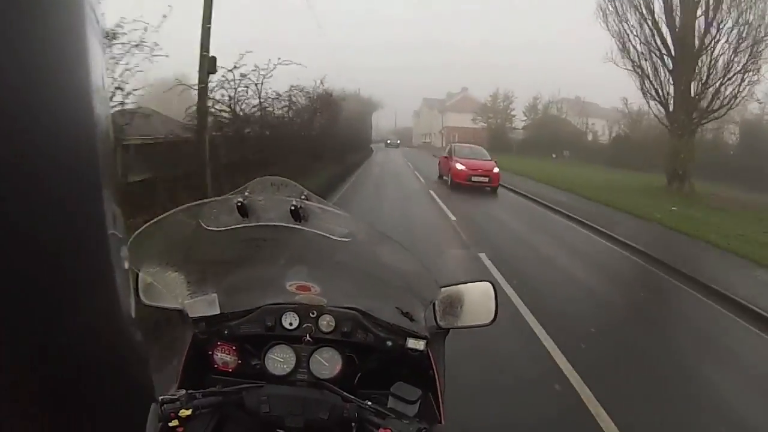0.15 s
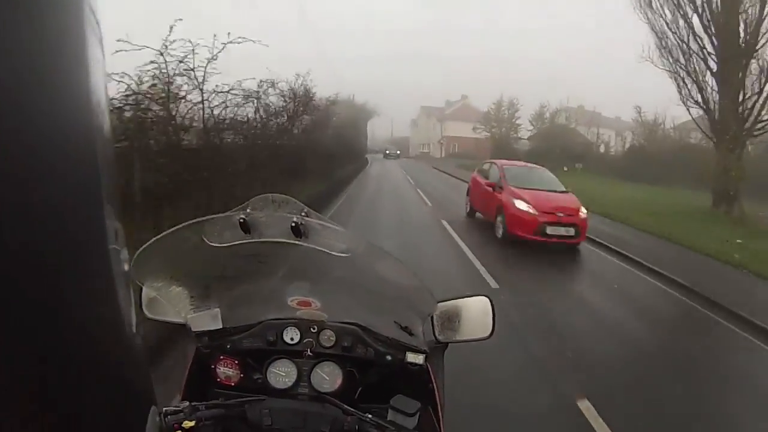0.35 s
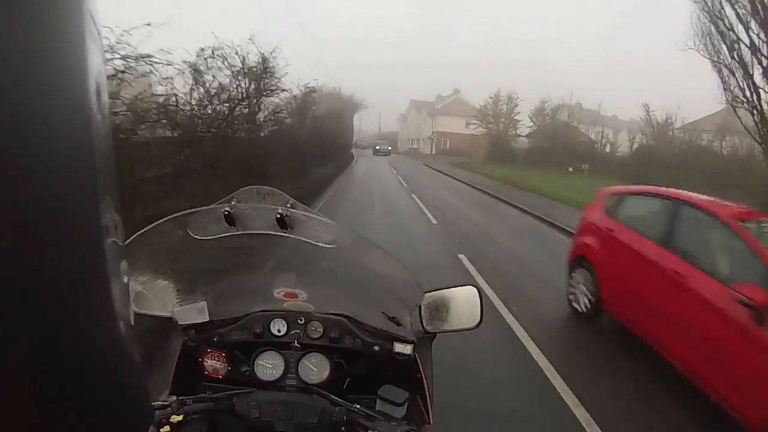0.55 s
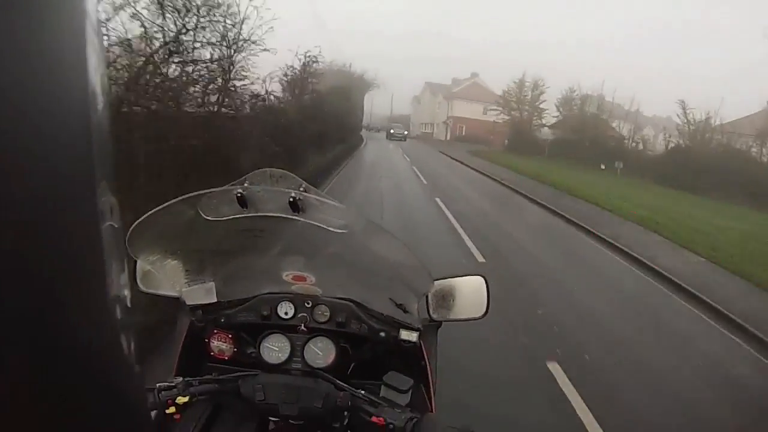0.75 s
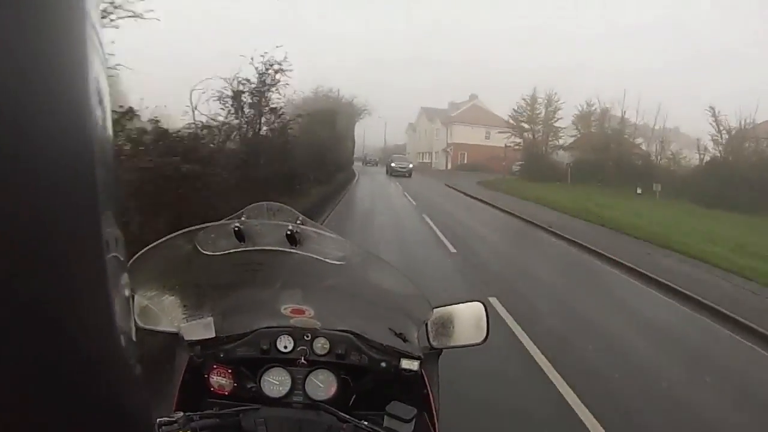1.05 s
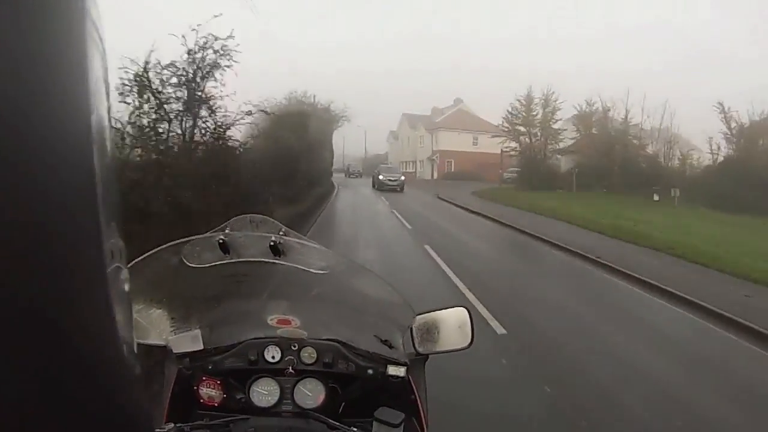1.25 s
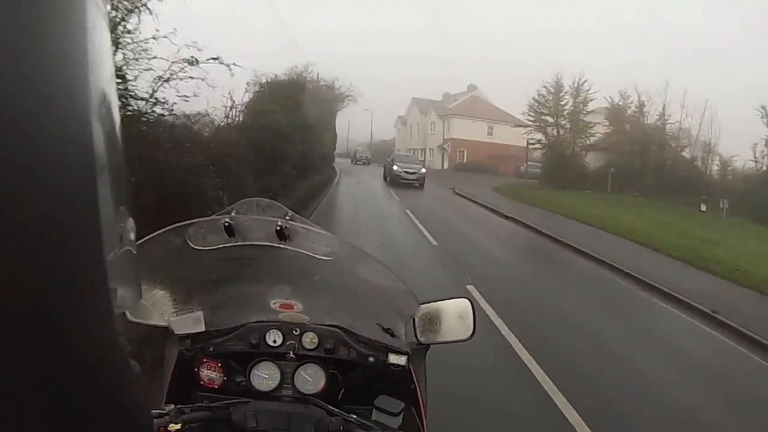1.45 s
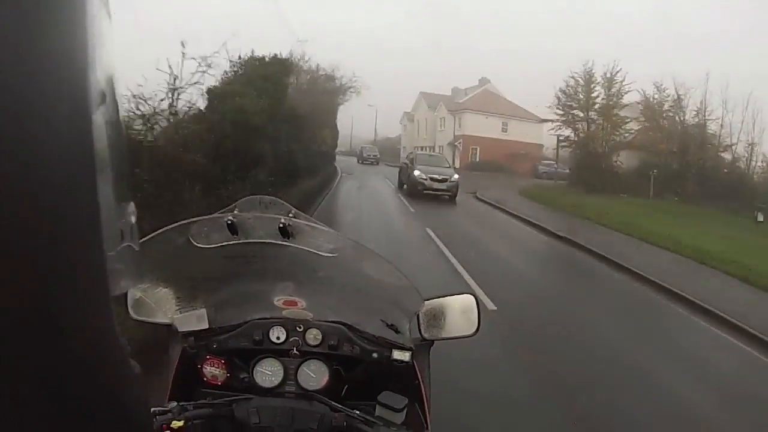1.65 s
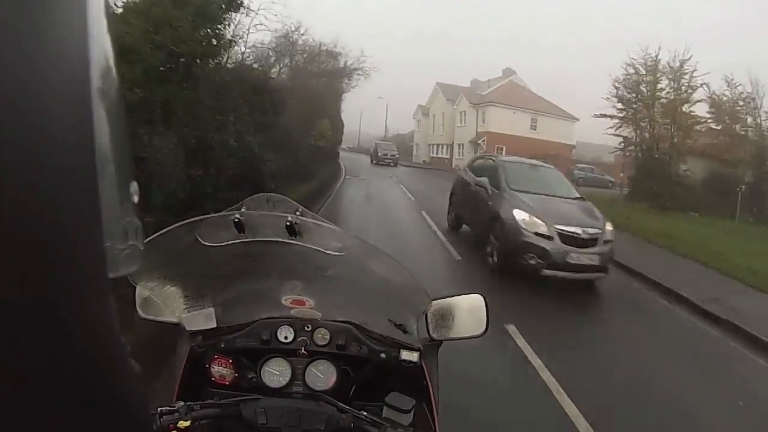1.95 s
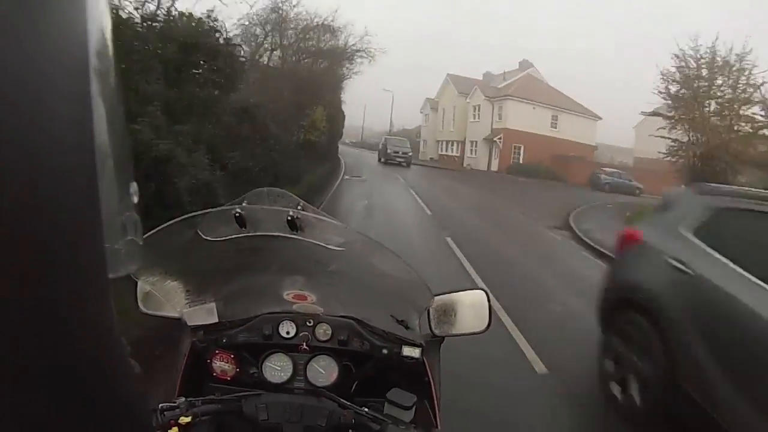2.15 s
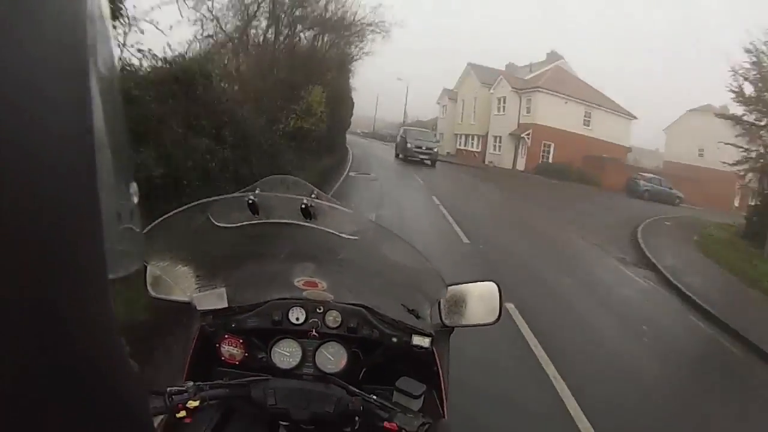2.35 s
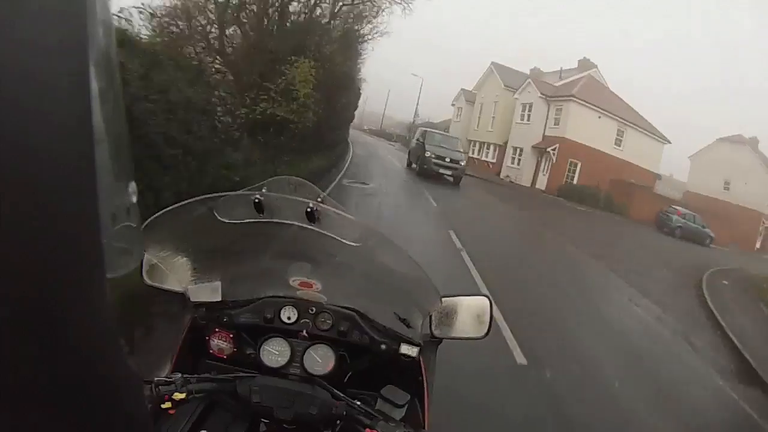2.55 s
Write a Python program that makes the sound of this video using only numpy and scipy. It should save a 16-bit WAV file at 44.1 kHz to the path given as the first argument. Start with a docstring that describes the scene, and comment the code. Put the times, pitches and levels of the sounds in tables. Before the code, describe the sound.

A plastic helmet visor clicks, knocks, then snaps loudly shut close to the microphone. Behind it a motorcycle hums along a wet road with wind, tyre spray and two passing cars, dipping after the snap and swelling back.

```python
"""Plastic, probably a visor, clicks, knocks and snaps shut by a microphone in a motorcyclist's helmet.
Each contact thuds the shell, rings and cracks. Behind it the bike cruises on a wet road:
exhaust hum, ticking valves, wind, tyre spray and two oncoming cars, coloured by the helmet.
The snap drives a limiter far down, and the ride swells back over more than a second."""
import sys
import numpy as np
from scipy import signal
from scipy.fft import rfft, irfft, next_fast_len
from scipy.io import wavfile
from scipy.ndimage import uniform_filter1d, minimum_filter1d, map_coordinates

SR = 44100
rng = np.random.default_rng(int(sys.argv[2]) if len(sys.argv) > 2 else 0)


def put_to_file(sound):
    """Save the sound as 16-bit audio at rate SR, in the file named by the first command-line argument."""
    columns = np.atleast_2d(sound).T  # one column per channel
    safe = np.clip(columns, -1, 1)
    whole_steps = np.round(safe * 32767)
    wavfile.write(sys.argv[1], SR, whole_steps.astype(np.int16))


N = 119070


def amp(db):
    """Decibels to gain."""
    return 10 ** (np.asarray(db) / 20)


def unit(x):
    """Scale to rms 1."""
    return x / np.sqrt(np.mean(x ** 2) + 1e-20)


def curve(rows):
    """One value per sample from (s, value) points."""
    return np.interp(np.arange(N) / SR, *np.transpose(rows))


def wobble(rate_hz):
    """Smooth random curve, rate_hz knots a second."""
    return map_coordinates(rng.standard_normal(2000), [np.arange(N) * rate_hz / SR + 4], mode="wrap")


def filtered(x, response):
    """Apply a gain given as a function of Hz."""
    size = next_fast_len(N + 8192)
    return irfft(rfft(x, size) * response(np.fft.rfftfreq(size, 1 / SR)), size)[..., :N]


def noise(spectrum):
    """Noise of rms 1 coloured by (Hz, dB) points."""
    hz, db = np.transpose(spectrum)
    white = rng.standard_normal(N)
    return unit(filtered(white, lambda f: amp(np.interp(np.log(f + 1), np.log(hz + 1), db))))


def eddies(spectrum, slow_db, fast_db, slow_hz, fast_hz):
    """Turbulent noise of rms 1 that swells and flutters."""
    return unit(noise(spectrum) * amp(slow_db * wobble(slow_hz) + fast_db * wobble(fast_hz)))


def resonances(x, bands):
    """Parallel band-passes from (Hz, width Hz, dB) rows."""
    return filtered(x, lambda f: sum(amp(db) * 1j * f * width / (hz * hz - f * f + 1j * f * width)
                                     for hz, width, db in bands))


# Oncoming cars. Each row: nearest moment in seconds, gain in dB, nearest distance over speed in seconds.
CAR_PASSES = [(.51, -31, 0.085), (1.99, -28.5, 0.21)]
# Tyre noise and tread roar. Each row: frequency in Hz, density in dB.
TYRE_SPECTRUM = [(200, -25), (500, -8.5), (720, 0.5), (1100, -3.5), (1480, -7), (1800, -9.5), (1900, -6.5),
                 (2400, -7.5), (2800, -12.5), (3300, -30.5), (5000, -27), (10000, -36.5), (15000, -61)]
TREAD_SPECTRUM = [(300, -33), (600, -8.5), (730, -1), (900, -2.5), (1080, -3.5), (1300, -10), (2000, -49)]
TREAD_DB, TREAD_LAG_S, CAR_MACH = 0.75, 0.04978, 0.11


def cars():
    """Tyre noise follows one over distance; the tread's roar drops in pitch as each car passes."""
    t, out = np.arange(N) / SR, np.zeros(N)
    for nearest_s, db, pass_s in CAR_PASSES:
        distance = np.hypot(1, (t - nearest_s) / pass_s)
        tread_distance = np.hypot(1, (t - nearest_s - TREAD_LAG_S) / pass_s)
        emitted_s = t - CAR_MACH * pass_s * tread_distance
        tread = map_coordinates(noise(TREAD_SPECTRUM), [emitted_s * SR], mode="wrap")
        out += amp(db) * (noise(TYRE_SPECTRUM) / distance + amp(TREAD_DB) * tread / tread_distance)
    return out


# Spray envelope. Each row: time in seconds, level in dB.
SPRAY_DB = [(0, -53), (.8, -53), (1.2, -51.5), (1.5, -48.5), (2.0, -46.5), (2.7, -50)]
# Spray hiss. Each row: frequency in Hz, density in dB.
SPRAY_SPECTRUM = [(1760, -12), (3000, -6), (3190, -1), (4090, -10), (4320, -9), (4820, 1), (5230, -4),
                  (5760, -3), (6690, -6.5), (7220, -5.5), (7840, -11), (9180, -13.5), (10200, -16),
                  (14600, -29), (15500, -36)]


def spray():
    """The tyres throw water off the road: a fluttering hiss."""
    hiss = eddies(SPRAY_SPECTRUM, slow_db=1.4, fast_db=1.3, slow_hz=18, fast_hz=470)
    return amp(curve(SPRAY_DB)) * hiss


# Wind envelopes. Each row: time in seconds, level in dB.
DRAUGHT_DB = [(0, -29.5), (.04, -25), (.1, -26), (.14, -21), (.2, -31), (.25, -24.5), (.36, -23.5),
              (.48, -21), (.55, -25), (.69, -29), (.82, -25), (1.0, -32.5), (1.2, -37), (2.7, -68)]
RUSH_DB = [(0, -31), (.8, -44), (1.27, -39), (1.38, -27.5), (1.6, -27.5), (1.9, -29), (2.25, -28.5),
           (2.6, -29), (2.7, -29)]
BUFFET_DB = [(0, -31), (.8, -41), (1.1, -36), (1.4, -32), (1.6, -45), (1.85, -35), (1.98, -32.5),
             (2.15, -38), (2.31, -27), (2.45, -35), (2.59, -27), (2.7, -40)]
GAP_DB = [(0, -38), (.06, -39), (.2, -43.5), (.35, -39), (.53, -40), (.58, -51), (.72, -58), (.9, -83)]
# Wind spectra. Each row: frequency in Hz, density in dB.
DRAUGHT_SPECTRUM = [(29, -45), (50, -4), (70, -10.5), (160, -0.5), (188, -5), (244, -0.5), (327, 0.5),
                    (456, -1), (623, -18), (853, -13.5), (1150, -7.5), (1600, -24), (1800, -18),
                    (2070, -24), (2300, -17), (3200, -47), (4160, -50), (7040, -120)]
RUSH_SPECTRUM = [(120, -30), (200, -9.5), (333, -12), (432, -3.5), (498, 0), (632, -3), (694, -5.5),
                 (801, -11.5), (1040, -9.5), (1270, -24.5), (1750, -18.5), (1920, -22), (2330, -13),
                 (3400, -31.5), (4420, -42.5), (7480, -120)]
BUFFET_SPECTRUM = [(20, -6), (45, -1), (100, -4.5), (220, -2), (350, -0.5), (700, -19.5), (1500, -57)]
GAP_SPECTRUM = [(1710, -24), (2900, 4), (3150, -1), (4600, -5.5), (6130, -10.5), (7110, -13.5),
                (7840, -21.5), (8410, -21.5), (10700, -23.5), (13100, -29), (15500, -41)]


def wind():
    """Draught and hiss in the visor gap fade once it shuts; air rushes round the shell and buffets it."""
    draught = eddies(DRAUGHT_SPECTRUM, slow_db=2.5, fast_db=1.4, slow_hz=22.76, fast_hz=140)
    rush = eddies(RUSH_SPECTRUM, slow_db=1.47, fast_db=1.5, slow_hz=12, fast_hz=110)
    buffet = eddies(BUFFET_SPECTRUM, slow_db=2, fast_db=-1.0, slow_hz=20, fast_hz=110)
    hiss = eddies(GAP_SPECTRUM, slow_db=1.0, fast_db=1.7, slow_hz=25, fast_hz=190)
    layers = [(DRAUGHT_DB, draught), (GAP_DB, hiss), (RUSH_DB, rush), (BUFFET_DB, buffet)]
    return sum(amp(curve(envelope)) * layer for envelope, layer in layers)


# Single eddies. Each row: centre in seconds, pitch in Hz, envelope peak in dB, half length in seconds.
WIND_BUMPS = [(0.198, 348, -15.5, .003), (0.469, 361, -12.5, 0.006), (1.336, 410, -17, 0.0044),
              (1.991, 257, -21, .007), (2.315, 100, -19.5, .008), (2.585, 189, -21.5, 0.01)]


def wind_bumps():
    """Single eddies bump the helmet: a few low cycles each."""
    t, out = np.arange(N) / SR, np.zeros(N)
    for centre_s, hz, db, half_s in WIND_BUMPS:
        offset_s = t - centre_s
        out += amp(db) * np.exp(-(offset_s / half_s) ** 2) * np.sin(2 * np.pi * hz * offset_s)
    return out


# Crank speed. Each row: time in seconds, turns per second.
CRANK_HZ = [(0, 40.12), (.8, 39.7), (1.4, 39.44), (2.0, 39.4), (2.7, 39.52)]


def crank_angle():
    """Crankshaft angle in radians; the speed wavers slightly."""
    speed_hz = curve(CRANK_HZ) * (1 + 0.0015 * wobble(14))
    return 2 * np.pi * np.cumsum(speed_hz) / SR


# Valve ticks. Each row: place in the cam's turn from 0 to 1, centre in Hz, filter width in Hz, gain in dB.
VALVE_TICKS = [(0.77, 4900, 390, -55), (0.2, 4920, 380, -61), (.41, 8330, 470, -62.5),
               (0.69, 9940, 1400, -62), (.35, 10400, 1240, -66), (.05, 10000, 1600, -66)]
# Ticking envelope. Each row: time in seconds, gain in dB.
TICK_DB = [(0, -9), (.9, -10), (1.2, -8.5), (1.6, 0), (2.7, -5.5)]
TICK_SHARPNESS, TICK_SCATTER_DB = 4.9, 4


def valves(crank_rad):
    """Each valve ticks once per cam turn, at half crank speed: a metallic sizzle of uneven strength."""
    out = np.zeros(N)
    for place, hz, width_hz, db in VALVE_TICKS:
        band = [(hz, width_hz, 0)]
        sizzle = resonances(resonances(rng.standard_normal(N), band), band)
        pulses = np.exp(TICK_SHARPNESS * np.cos(crank_rad / 2 - 2 * np.pi * place))
        strength = amp(TICK_SCATTER_DB * wobble(29.83))
        out += amp(db) * unit(sizzle * pulses * strength)
    return amp(curve(TICK_DB)) * out


# Exhaust hum. Each row: multiple of the crank speed, level in dB.
EXHAUST_ORDERS = [(2, -34.5), (3, -35.5), (4, -40), (5, -46.5), (6, -40), (7, -46.5), (8, -48), (9, -54),
                  (10, -48.5)]
# Engine clatter. Each row: frequency in Hz, density in dB.
CLATTER_SPECTRUM = [(76, -21), (130, -4), (141, 0.5), (338, 2), (427, -29), (576, -38), (600, -23),
                    (651, -21), (1480, -13.5), (1560, -10), (3400, -50.5), (4420, -68), (7480, -120)]
FIRING_JITTER_RAD, ROUGHNESS_DB = 0.05, 1.2
CLATTER_DB, CLATTER_DEPTH = -36, 0.63


def engine(crank_rad):
    """The exhaust hums at crank harmonics, each wavering slightly in level; clatter pulses once a turn."""
    firing_rad = crank_rad + FIRING_JITTER_RAD * wobble(29.92)
    hum = np.zeros(N)
    for order, db in EXHAUST_ORDERS:
        peak = np.sqrt(2) * amp(db + ROUGHNESS_DB * wobble(38))
        hum += peak * np.sin(order * firing_rad + rng.uniform(0, 2 * np.pi))
    clatter = noise(CLATTER_SPECTRUM) * (1 + CLATTER_DEPTH * np.cos(crank_rad))
    return hum + amp(CLATTER_DB) * unit(clatter)


# Helmet resonances. Each row: centre in Hz, width in Hz, gain in dB.
HELMET_BANDS = [(492.2, 7.8, -5), (723, 23, -13), (1700, 16, -1), (2380, 27, -19.5), (4860, 36, -8.5),
                (8370, 110, -7.5), (9800, 150, -11.5), (10700, 110, -3), (12100, 200, -10),
                (13130, 150, -5)]


def helmet(outside):
    """The helmet adds narrow resonances to the sound from outside."""
    return outside + resonances(outside, HELMET_BANDS)


# Plastic contacts. Each row: start in seconds, then thud, ring and crack gains in dB.
VISOR_CONTACTS = [(0.1163, -8, -7, -10.5), (0.1182, -5, -5.5, -21), (0.1204, -7, -13, -40),
                  (0.1261, -5, -17, -47), (0.1274, -25, -12, -40), (0.1335, -10, -40, -39),
                  (0.5714, 12.5, -7, -17), (0.5748, -1.5, -18, -22.5), (0.7055, -35, -27, -17),
                  (0.7077, -34, -10, -30), (0.7101, -17, -2, -2.5), (0.7106, -1.5, 4, 9),
                  (.7119, 6, 27.5, 21.5), (1.885, -10, -16, -22), (2.021, -10, -21, -25),
                  (2.3236, -25, -25, -27), (2.3273, -26, -11.5, -17.5)]
# Low and high shell modes. Each row: frequency in Hz, relative level in dB, T60 in seconds.
THUD_MODES = [(147, -19.5, 0.038), (275, -5, 0.012), (377, -4, 0.012), (1230, -13.5, 0.019),
              (1440, -1, 0.0066)]
RING_MODES = [(1637, 0.5, 0.0057), (1760, -3, 0.011), (2036, 2, 0.012), (2264, -0.5, 0.0081),
              (2493, -10.5, 0.015), (5170, -20, 0.0048), (5370, -13, 0.0045), (6430, -12.5, 0.0057),
              (6940, -22, 0.0026), (8040, -24.5, 0.0039)]
# Contact crack. Each row: frequency in Hz, density in dB.
CRACK_SPECTRUM = [(120, -25), (420, 8.5), (900, 4), (1500, 5), (2600, 4), (3050, -12), (4000, -3),
                  (5100, -2), (9000, -16), (15000, -31)]
CONTACT_RISE_S, CRACK_T60_S = 0.00017, 0.0099


def struck_modes(modes, t):
    """Decaying sines of the struck shell."""
    return sum(amp(db - 60 * t / t60_s) * np.sin(2 * np.pi * hz * t) for hz, db, t60_s in modes) / 2


def visor():
    """Each plastic contact thuds the shell, rings briefly and cracks."""
    t, out = np.arange(SR // 10) / SR, np.zeros(N + SR)
    rise = 1 - np.exp(-t / CONTACT_RISE_S)
    thud, ring = struck_modes(THUD_MODES, t), struck_modes(RING_MODES, t)
    for start_s, thud_db, ring_db, crack_db in VISOR_CONTACTS:
        crack = noise(CRACK_SPECTRUM)[:len(t)] * amp(crack_db - 60 * t / CRACK_T60_S)
        contact = rise * (amp(thud_db) * thud + amp(ring_db) * ring + crack)
        out[round(start_s * SR):][:len(t)] += contact
    return out[:N]


def scene():
    """The ride through the helmet, plus bumps and visor; one microphone feeds both channels."""
    crank_rad = crank_angle()
    ride = engine(crank_rad) + valves(crank_rad) + wind() + spray() + cars()
    return np.tile(helmet(ride) + wind_bumps() + visor(), (2, 1))


LOW_CUT_HZ, HIGH_CUT_HZ = 52, 15350
CEILING_DB, ATTACK_S, RECOVERY_PER_S = 2, 0.00085, 0.76


def record(dry):
    """Low cut, limiter with fast attack and slow linear recovery, clipping, high cut."""
    x = signal.sosfilt(signal.butter(3, LOW_CUT_HZ, "high", fs=SR, output="sos"), dry)
    allowed_gain = np.minimum(1, amp(CEILING_DB) / (np.abs(x).max(axis=0) + 1e-9))
    climb = RECOVERY_PER_S * np.arange(N) / SR
    held_gain = np.minimum.accumulate(allowed_gain - climb) + climb
    attack_samples = round(ATTACK_S * SR)
    gain = uniform_filter1d(minimum_filter1d(held_gain, attack_samples // 2 + 1), attack_samples)
    return filtered(np.clip(x * gain, -1, 1), lambda hz: hz < HIGH_CUT_HZ)


dry = scene()
out = record(dry)
put_to_file(out)
```